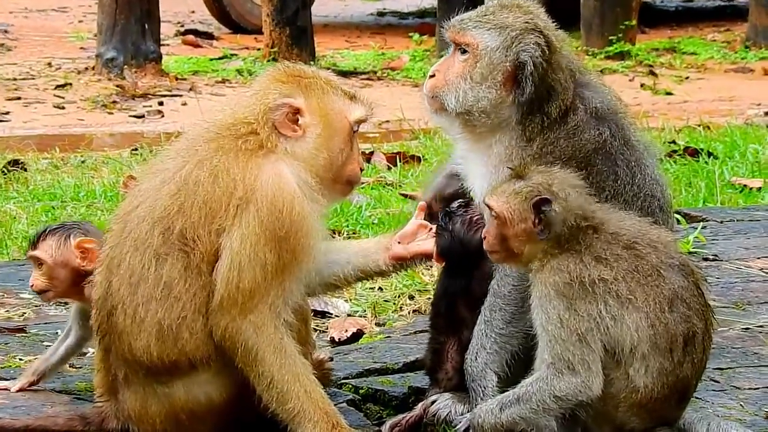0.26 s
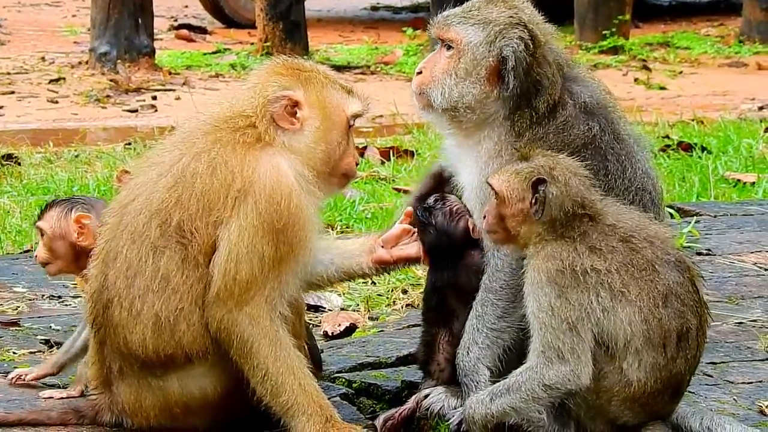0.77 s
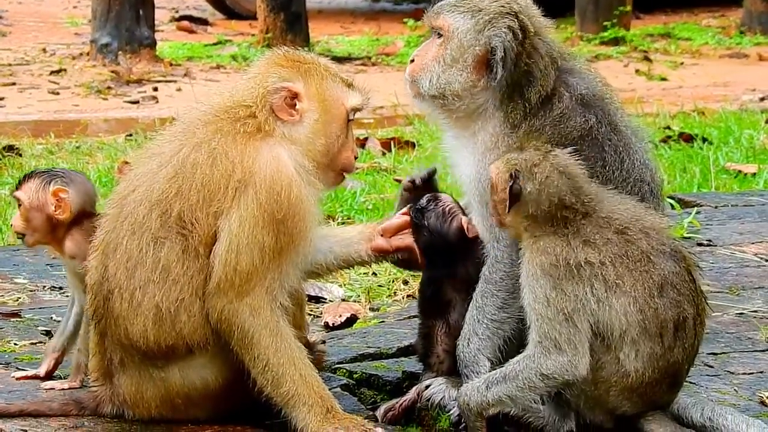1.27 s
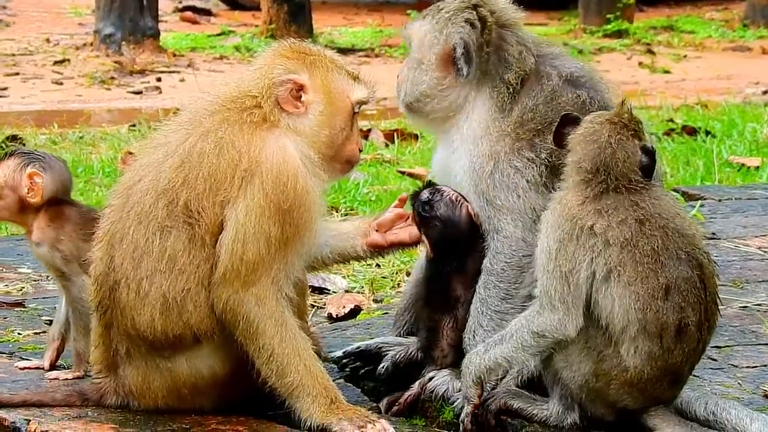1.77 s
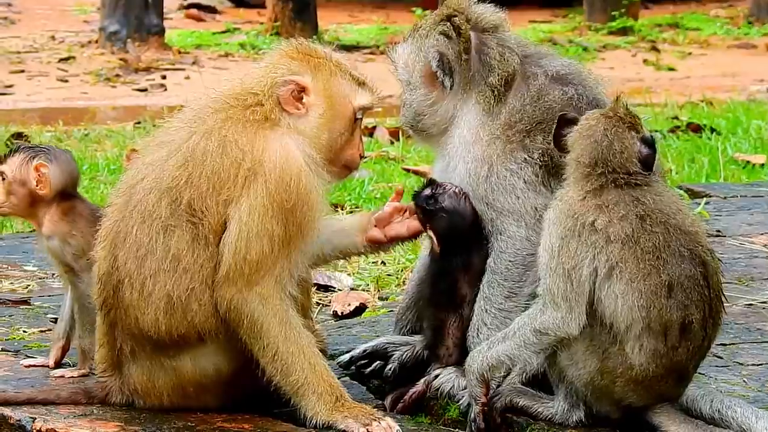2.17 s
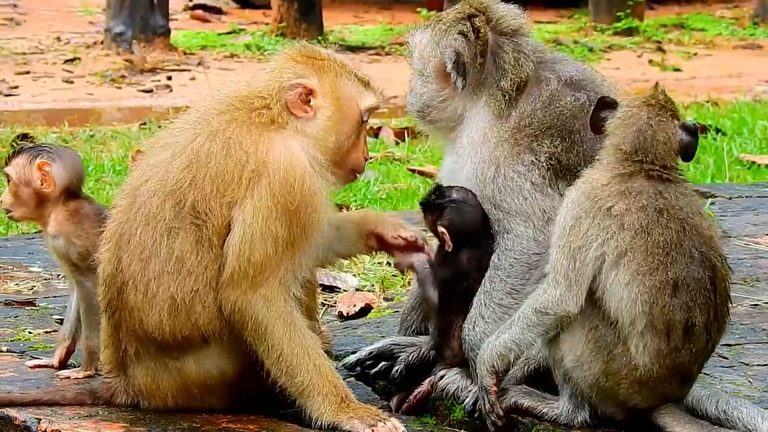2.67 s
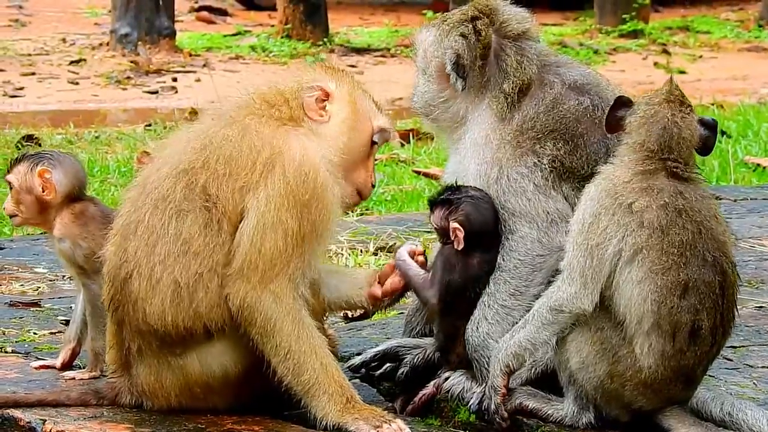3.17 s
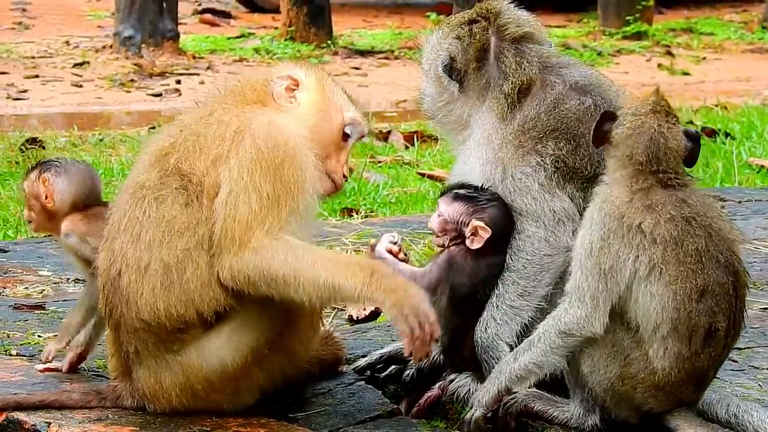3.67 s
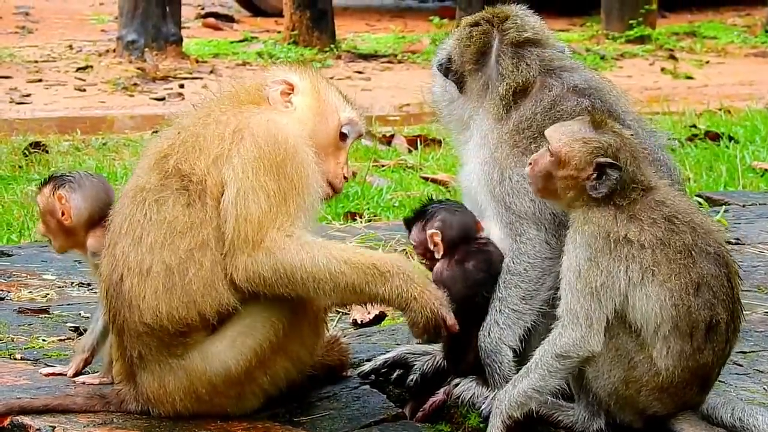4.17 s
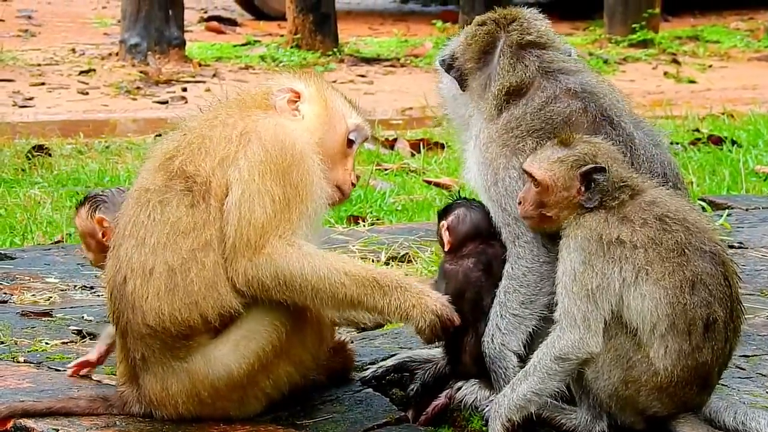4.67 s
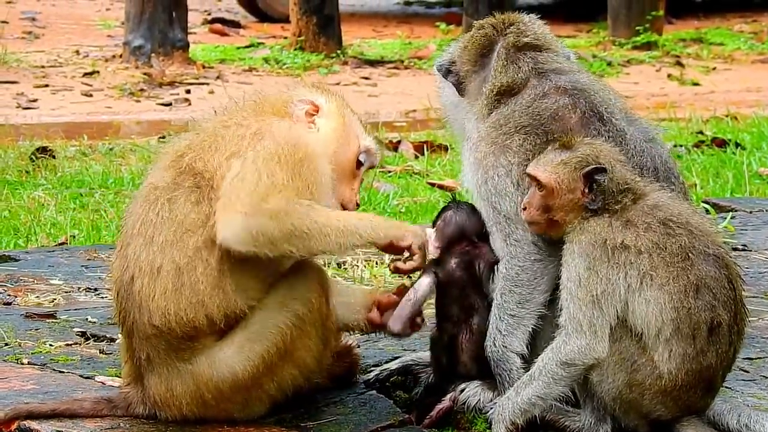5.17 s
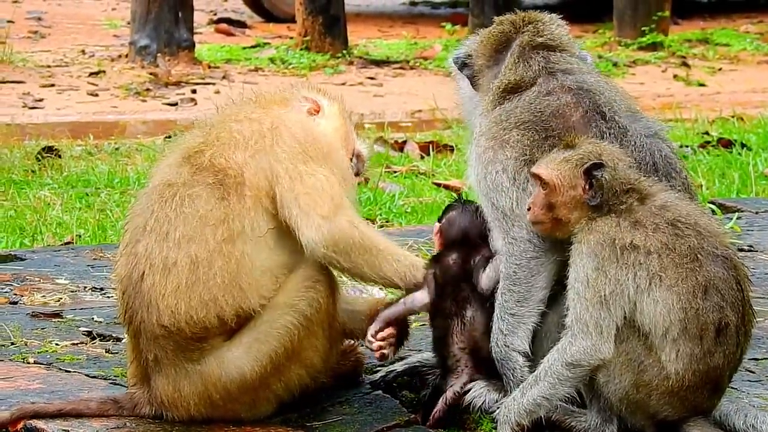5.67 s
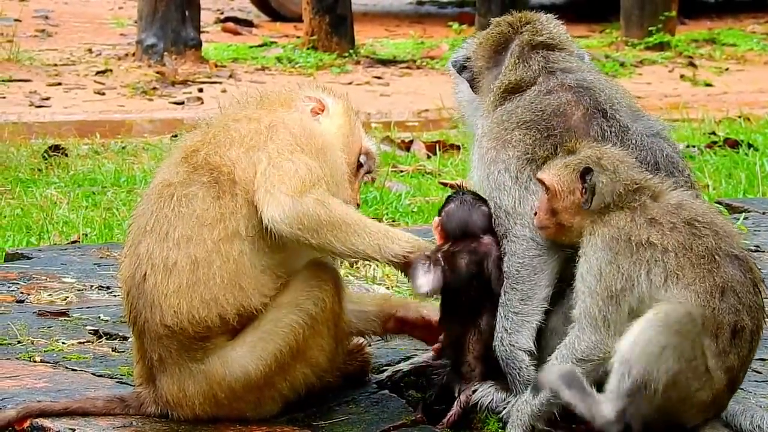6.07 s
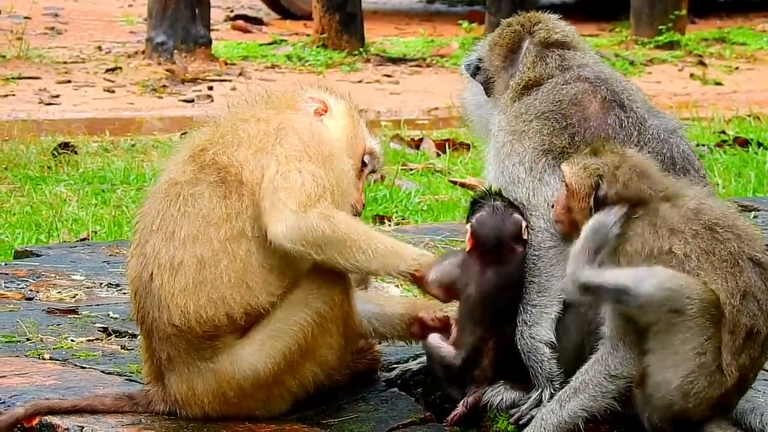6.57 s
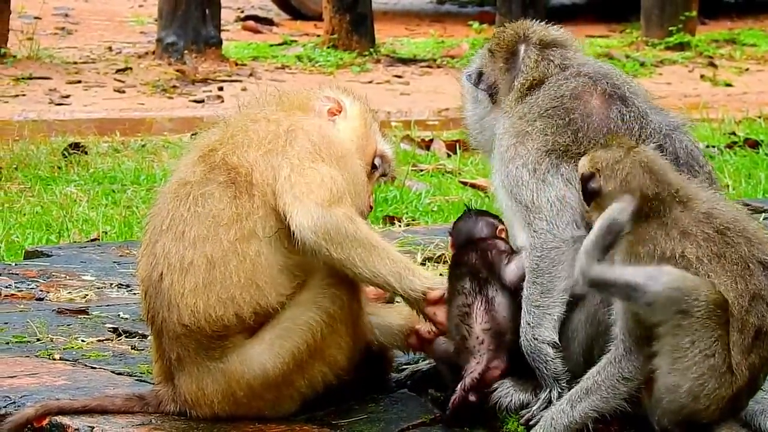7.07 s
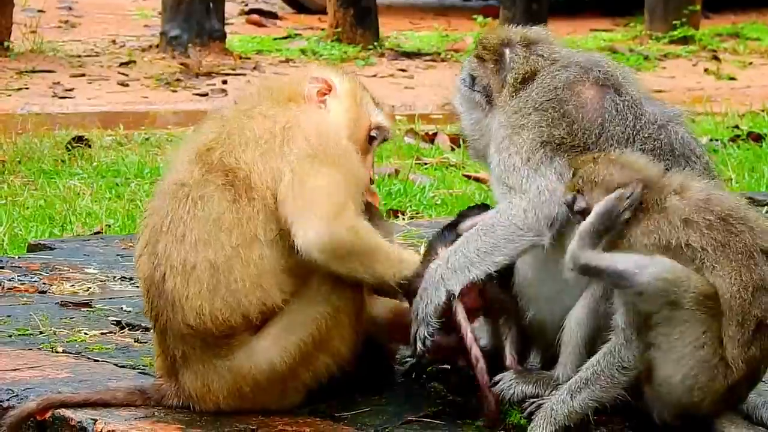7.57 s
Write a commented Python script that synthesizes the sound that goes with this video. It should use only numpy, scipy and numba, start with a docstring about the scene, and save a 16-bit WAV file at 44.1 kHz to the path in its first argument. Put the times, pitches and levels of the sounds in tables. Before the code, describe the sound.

A small monkey troop squabbles outdoors. A hoarse screech is already under way, and raspy bursts follow several times a second, mixed with bright squeals, short chirps and a few whistled coos. Two sharp twig snaps and dull foot thuds come close by. After about five seconds the calls thin out and weaken, leaving rustling, scuffs and a faint late grunt over low rumble and thin hiss.

```python
"""A hoarse screech is already under way, then a quarrelling troop of monkeys: screeches, squeals, chirps, coos
and a late low grunt. Rough folds and breath drive moving mouth resonances; clear calls and chirps are sums
of gliding harmonics. Twigs snap and feet thud as fading modes, and scuffs are gliding bands of noise. Trunks
and leaves smear the calls over filtered noise: a far rumble, rustling and faint hiss."""
import sys
import numpy as np
from scipy import signal
from scipy.fft import rfft, irfft, next_fast_len
from scipy.io import wavfile
from scipy.ndimage import uniform_filter1d
from numba import njit

SR = 44100
rng = np.random.default_rng(int(sys.argv[2]) if len(sys.argv) > 2 else 0)


def to_wav(sig):
    """Store sig (one row per channel, or 1-D mono) as 16-bit WAV at the path in sys.argv[1].

    Samples outside -1..1 are clipped; the rate is SR.
    """
    pcm = np.clip(np.atleast_2d(sig), -1, 1) * 32767
    pcm = np.round(pcm).astype(np.int16)
    wavfile.write(sys.argv[1], SR, pcm.T)  # frames by channels


N = 344421
T = np.arange(N) / SR
STEPS = T[::100]  # coarse clock for slow envelopes
SIDES = np.array([[1], [-1]])  # left, right

# Far hiss spectrum, before it is scaled to HISS_DB: [f/Hz, level/dB]
HISS_SPECTRUM = [(18, -57), (30, -8.5), (98, 0.5), (181, 5), (343, -49), (550, -5.5), (842, -6),
                 (1670, -15), (3480, -38), (6130, -15.5), (8540, -18.5), (11100, -25.5), (18800, -120)]
# Faint treble hiss spectrum, before it is scaled to AIR_DB: [f/Hz, level/dB]
AIR_SPECTRUM = [(6000, -72), (9000, -13), (11000, 5), (14000, -1), (15700, -3.5)]
# Uneven swells of the ground noise:
# [peak t/s, width t/s between 1/e power points, rumble level/dB, rustle level/dB]
GROUND_SWELLS = [(0.394, 0.33, -89, -61.5), (0.98, 0.13, -68.5, -64), (1.365, 0.4, -78, -61),
                 (1.595, 0.25, -98, -67), (2.449, 0.067, -64.5, -65), (2.663, 0.13, -62.5, -72),
                 (3.221, 0.15, -70, -68), (3.723, 0.22, -69.5, -100), (3.948, 0.12, -84, -64.5),
                 (4.712, 0.12, -70, -67), (5.359, 0.34, -73.5, -92), (5.701, 0.043, -71, -102),
                 (6.044, 0.45, -63, -68.5), (6.548, 0.31, -71.5, -69.5), (7.135, 0.28, -68, -72),
                 (7.334, 0.11, -86, -65), (7.518, 0.13, -60.5, -66), (7.747, 0.49, -65, -81)]
# Beds between the calls, fainter screeching and rustling leaves: [t/s, screech level/dB, rustle level/dB]
BEDS = [(0, -57, -82), (.5, -53.5, -75), (.75, -56.5, -95), (1.3, -51, -78), (1.9, -74, -65.5),
        (2.1, -67.5, -76.5), (2.4, -61, -73), (3, -64.5, -84), (3.5, -75, -84.5), (4.1, -60, -68.5),
        (4.6, -69, -74.5), (5.1, -65.5, -77.5), (5.45, -71.5, -71.5), (5.8, -76.5, -79), (6.8, -82.5, -73),
        (7.81, -96, -69)]
# Tint of the screech bed: one level/dB each for lower mouth, upper mouth, throat and top resonance
BED_TINT_DB = [2.5, 0, -10, -2.5]
# Small throats give little bass and foliage takes the treble: [f/Hz, level/dB]
FOLIAGE = [(500, -11.5), (1100, -6.5), (1500, 1.5), (7200, -4.5), (8300, -8.5), (9500, -19.5), (13000, -24)]
# Each snap and its quick reflection from the other side: [t/s, level/dB, left minus right level/dB,
# reflection later by t/s, its level/dB, its left minus right level/dB, hiss level/dB against the snap]
SNAPS = [(1.0411, -16, -10, .0007, -15, 16, -31), (2.3215, -12.5, 16, .0030, -9, -10, -41)]
# Modes of a snapping twig: [f/Hz, level/dB, fade by 60 dB t/s]
TWIG_MODES = [(4763, -12.5, 0.0075), (5880, -14, 0.013), (6730, -2.5, 0.0072), (7700, -16, 0.012),
              (8900, -27, 0.0075), (10940, -33, 0.0073), (14500, -68, .008)]
# Foot thuds: [t/s, level/dB, main mode f/Hz, fade by 60 dB t/s]
THUDS = [(2.309, -34.5, 1652, 0.035), (3.17, -42.5, 899.5, 0.029), (5.814, -54.5, 640.9, 0.069),
         (7.485, -40, 630, 0.039), (7.539, -54, 842, 0.087)]
# Fur and feet scuffing on the paving: [start t/s, level/dB, centre f/Hz at the start, glide f/Hz per s]
SCUFFS = [(6.06, -73, 1865, -2000), (6.2, -69.5, 1287, -1000), (6.299, -63.5, 1117, 1998),
          (6.531, -82, 1142, 8.5), (6.641, -71, 1550, -1000), (6.77, -75, 1231, -1000),
          (6.9, -76.5, 1081, -1000), (7.15, -77, 1496, 1998), (7.27, -64, 2200, -5000),
          (7.345, -66, 1588, -7000), (7.399, -73, 1060, -4000), (7.471, -61.5, 809, 1997),
          (7.55, -70, 1099, 0), (7.66, -72.5, 1390, -1000)]
# Chirps: [start t/s, half duration t/s, glide (share of pitch per half duration), pitch f/Hz,
# then the level/dB of harmonics 1 to 5]
CHIRPS = [(0.3505, 0.022, 0.054, 1431, -52, -36, -41, -58, -62),
          (0.389, 0.032, -0.076, 1470, -69, -37.5, -42, -61, -40),
          (0.49, 0.028, 0.003, 1450, -92, -49, -39.5, -51, -46),
          (0.7395, 0.02, -0.011, 1642, -70, -39.5, -32, -37, -64),
          (1.31, 0.019, 0.009, 1583, -66, -37.5, -56, -58, -53),
          (1.35, 0.047, 0.033, 1348, -74, -70, -48, -46, -61),
          (1.406, 0.033, -0.005, 1350, -71, -46.5, -57, -35, -60),
          (1.525, 0.032, 0.058, 1634, -71, -52, -33, -64, -70),
          (1.652, 0.043, -0.0056, 1921, -50.5, -41, -53, -69, -71),
          (1.9492, 0.024, -0.043, 1330, -55, -52, -37.5, -42, -63),
          (2.404, 0.015, -0.016, 1628, -60, -59, -38, -54, -66),
          (2.4394, 0.076, 0.0008, 1532, -68, -45, -64, -60, -53),
          (2.536, 0.043, 0.06, 1853, -62, -44.5, -39.5, -41.5, -57),
          (2.7137, 0.068, 0.0037, 1745, -68, -46, -50, -53, -72),
          (2.7694, 0.033, -0.059, 1706, -52, -41.5, -47, -56, -77),
          (3.056, 0.035, 0.034, 1594, -83, -47, -44, -49, -55),
          (3.085, 0.039, -0.072, 1427, -80, -45, -44, -70, -60),
          (3.228, 0.03, -0.0036, 1630, -79, -48.5, -40, -48, -67),
          (3.288, 0.058, 0.09, 1503, -91, -45.5, -73, -70, -71),
          (3.563, 0.054, -0.004, 1693, -63, -38, -55, -56, -51),
          (3.63, 0.055, -0.078, 1600, -59, -46, -46, -52, -59),
          (4.0615, 0.034, 0.0036, 1644, -56, -44.5, -37.5, -52, -66),
          (4.09, 0.029, 0.0, 1292, -58, -52, -40, -56, -46),
          (4.2705, 0.024, 0.0059, 1234, -78, -62, -47, -49, -66),
          (4.435, 0.0446, -0.0116, 1661, -81, -44, -39.5, -50, -57),
          (4.602, 0.0353, -0.12, 1394, -72, -45.5, -56, -57, -58),
          (4.675, 0.051, -0.035, 1264, -61, -52, -54, -65, -63),
          (4.8594, 0.021, 0.043, 1302, -72, -36.5, -59, -55, -65),
          (4.885, 0.029, -0.024, 1772, -77, -38.5, -40, -65, -44),
          (5.1249, 0.04, -0.026, 1568, -77, -44, -51, -72, -65),
          (5.28, 0.048, 0.075, 1503, -63.5, -55.5, -65, -52, -71),
          (5.35, 0.085, 0.031, 1714, -89, -58, -89, -72, -71),
          (5.6125, 0.05, -0.006, 1853, -59, -48, -68, -71, -59),
          (6.3904, 0.037, -0.052, 1770, -74, -55, -50.5, -84, -61),
          (7.162, 0.047, 0.015, 1783, -74, -49.5, -41.5, -75, -62),
          (7.497, 0.036, 0.015, 1500, -55.5, -57.5, -60, -65, -66)]
# Coos, with the first squeal's fundamental as first row and a low grunt as last, a list of points per call:
# [t/s, pitch f/Hz, fundamental level/dB, 2nd harmonic level/dB]
COOS = [
    [(0.16, 718, -78, -78), (0.2, 790, -66, -80), (0.235, 790, -67, -72), (0.28, 800, -72, -84)],
    [(1.41, 942, -82, -81), (1.426, 935, -59, -58), (1.444, 1019, -50, -84), (1.528, 1015, -47, -100),
     (1.612, 1075, -38.5, -64), (1.68, 1072, -50, -69), (1.904, 1043, -53, -61), (1.964, 969, -69, -70),
     (1.99, 1025, -85, -70)],
    [(2.33, 601.5, -105, -88), (2.36, 593, -64, -95), (2.406, 633, -57, -99), (2.426, 650, -60, -85),
     (2.466, 646.5, -56.5, -103), (2.662, 586, -66, -98), (2.7, 580, -102, -88)],
    [(3.8, 791, -80, -102), (3.824, 805, -52.5, -77), (3.9, 911.2, -50.5, -82), (4.13, 915, -51, -48.5),
     (4.2, 919.4, -49, -57), (4.258, 907, -53.5, -39), (4.358, 898, -59.5, -101), (4.406, 874, -62, -48),
     (4.42, 819, -100, -71)],
    [(7.42, 611, -72, -76), (7.46, 628, -63, -72), (7.59, 647, -71, -76)],
]
# Squeals, a list of points per call: [t/s, pitch f/Hz, level/dB of 2nd, 3rd and 4th harmonic]
SQUEALS = [
    [(.17, 770, -62, -81, -67), (.205, 784, -55, -75, -52), (.24, 870, -74, -72, -60),
     (.275, 880, -84, -64, -53), (.3, 887, -71, -60, -59), (.39, 880, -68, -61, -66)],
    [(.545, 831, -62, -48, -65), (.59, 929, -60, -54, -47.5), (.65, 913, -66, -60, -48),
     (.7, 905, -63, -57, -53), (.74, 860, -62, -60, -60)],
    [(.9, 740, -80, -64, -61), (.915, 752, -78, -60.5, -48), (.978, 872, -65, -52, -46),
     (1.08, 860.6, -68, -55, -45), (1.15, 803, -68, -73, -56)],
    [(2.13, 875, -80, -62, -72), (2.18, 890, -72, -66, -76), (2.21, 925, -58, -58, -62),
     (2.25, 925, -50, -62, -56), (2.3, 915, -58, -60, -58)],
    [(5.87, 789, -61, -67, -106), (5.915, 923, -66, -65, -68), (5.96, 929, -67, -55, -55),
     (6.005, 896, -56, -54.5, -58), (6.05, 880, -76, -56, -60), (6.09, 896, -73, -68, -62.5),
     (6.22, 908, -96, -92, -78)],
]
# Pitch unsteadiness, one share of the pitch per squeal
SQUEAL_WAVER = [.012, .007, .004, .012, .014]
# Upper harmonics, one row per squeal: [level/dB of harmonics 5 to 9 against the 4th]
SQUEAL_TOP_DB = [
    [3, 6, -6, 1, -12],
    [-29, -10, -9.5, -23, -21],
    [-36, -28, -19, -24, -29],
    [-10, -10, -10, -15, -20],
    [-20, -6, -6, -11, -17],
]
# How much each harmonic flares and drops out: one level/dB spread factor per squeal
SQUEAL_BREAKUP_DB = [6, 4, 2, 5, 5]
# Hoarse screeches: [start t/s, rise t/s, hold t/s, level/dB, lower mouth f/Hz, upper mouth f/Hz, top f/Hz,
# upper, throat and top level/dB against the lower, vocal fold rate f/Hz, left minus right level/dB]
SCREECHES = [(-0.048, 0.039, 0.049, -47, 3440, 4640, 6630, 8, -4.5, 8, 913, -1.5),
             (0.15, 0.12, 0.084, -48, 3800, 5440, 6970, 5.5, -1, 6, 881, 1.5),
             (0.311, 0.091, 0.077, -49.0, 2900, 5200, 6660, 4, -28, 8.5, 763, 2),
             (0.424, 0.058, 0.031, -45.5, 3300, 4870, 5850, 3, -2.5, -3, 901, -2),
             (0.51, 0.067, 0.048, -52.5, 3540, 5620, 5730, -12, -16, 8.5, 912, -2.5),
             (0.648, 0.071, 0.04, -43.0, 3270, 5000, 6370, -2.5, -29, -2, 871, -1.5),
             (0.749, 0.054, 0.092, -52.0, 2770, 5170, 6140, 5.5, -26, 2.5, 910, -0.5),
             (0.868, 0.1, 0.048, -55, 3340, 5820, 6730, -8, -20, -23, 877, 7),
             (0.997, 0.079, 0.056, -38, 3220, 5350, 6600, 5, -38, 2.5, 864, 1.5),
             (1.23, 0.082, 0.058, -48.0, 3460, 5040, 6200, -2.5, -8, -4, 789, -0.5),
             (1.339, 0.089, 0.028, -50.5, 3650, 5350, 5940, 4, -14, 5, 789, 0),
             (1.476, 0.072, 0.086, -51.5, 3240, 5000, 7030, 7, -6.5, 0.5, 840, 0.5),
             (1.6, 0.065, 0.096, -55.0, 3740, 5430, 5900, 10.5, -5.5, 7.5, 954, -1),
             (1.792, 0.077, 0.1, -59.5, 4200, 6060, 6270, -17, 4, -21, 952, 1.5),
             (1.888, 0.07, 0.021, -44.5, 3670, 5110, 6860, 4, -29, 0, 928, -2.5),
             (2.151, 0.11, 0.015, -50.5, 4180, 4450, 6800, 8, -2.5, 7.5, 918, -0.5),
             (2.315, 0.019, 0.08, -49.5, 3090, 4640, 6600, 4.5, -14, 9, 812, 1),
             (2.495, 0.047, 0.012, -46.5, 3180, 6200, 6170, 9, -9.5, 5, 958, 0.5),
             (2.647, 0.11, 0.15, -47.5, 2780, 5430, 6600, -1, -25, -2.5, 890, 0.5),
             (2.874, 0.019, 0.047, -58.0, 2560, 4960, 6500, -7, -19, -13, 951, 2),
             (3.02, 0.087, 0.038, -46.5, 3260, 5050, 7100, -0.5, -30, 1, 919, -0.5),
             (3.172, 0.04, 0.016, -52.0, 3380, 5000, 6400, -20, -4.5, -5, 798, 0.5),
             (3.259, 0.079, 0.043, -54, 2800, 4970, 7100, 0.5, -39, 1.5, 812, 2.5),
             (3.52, 0.05, 0.13, -50.0, 2970, 5050, 6830, -4, -17, -1.5, 780.5, 2.5),
             (3.699, 0.098, 0.17, -60, 3940, 4090, 6150, 7.5, -2, 0.5, 822, 0),
             (3.823, 0.089, 0.11, -53.0, 3320, 5240, 6520, 1, -6.5, 3.5, 888, 1.5),
             (4.016, 0.061, 0.013, -45, 3200, 5440, 6060, -6.5, -30, -7.5, 953, 1.5),
             (4.161, 0.1, 0.062, -52.5, 3670, 5460, 6700, 2.5, 0.5, 5.5, 975, 0),
             (4.361, 0.077, 0.013, -54, 3160, 5070, 6830, 1.5, -4, 4, 826.5, 0),
             (4.577, 0.0638, 0.0561, -53.0, 3700, 4760, 6900, 7, -8, 0.5, 933, 0),
             (4.701, 0.043, 0.13, -61.5, 2570, 5250, 6900, -19, -9, -29, 921, 1.4),
             (4.834, 0.042, 0.014, -43, 3034, 5168, 7000, 5, -35, -2, 949.4, 0),
             (5.103, 0.027, 0.06, -50, 2900, 5400, 6400, -2, -30, -3.5, 784.5, 1),
             (5.17, 0.055, 0.062, -57, 3000, 5050, 6200, 3.5, -24, 0, 777, 1),
             (5.451, 0.086, 0.1, -61.0, 3160, 6300, 5930, -17, 1.5, -0.5, 868, 2.5),
             (5.591, 0.022, 0.032, -54.5, 3630, 5250, 6420, -1.5, -10, 3, 930, -2),
             (5.841, 0.11, 0.14, -59.5, 3280, 5670, 5950, -24, 4.5, 5, 893, -2.5),
             (6.29, 0.12, 0.016, -56.5, 3250, 5540, 7640, -1, -17, 2, 886, 0),
             (6.61, 0.1, 0.026, -72, 2760, 5100, 6650, -0.5, 0.5, 3.5, 962, 2),
             (6.78, 0.049, 0.016, -77, 2750, 4620, 7270, -3, -5, 7.5, 917, -1),
             (7.104, 0.067, 0.045, -65.5, 3610, 5400, 6940, 6.5, 4.5, 13.5, 886, 1.5),
             (7.249, 0.023, 0.11, -76, 2480, 5460, 6870, 7.5, 2, 14.5, 887, 1),
             (7.426, 0.082, 0.13, -64.5, 4140, 5330, 6160, -0.5, 1, 0, 762, 5.5),
             (7.67, 0.037, 0.064, -71, 2430, 4680, 6660, 2.5, -13, 5.5, 922, -1)]

HISS_DB, AIR_DB, RUMBLE_DB = -62.5, -85.5, -76.5  # the rumble is the bed between the swells
TREES_T60_S, TREES_DB, SIDE_DB, SIDE_HZ = 0.32, -4, 0, 5370
PORT_LAG = .3  # half the lag between the two microphone ports, in samples
TOP_HZ = 15700
CRACK_S = .001  # decay of the hiss as the fibres part
SCUFF_RISE_S, SCUFF_HOLD_S, SCUFF_FALL_DB_PER_S = 0.05, 0.03, 170
COO_WAVER, COO_BREAKUP_DB = 0.0055, 1.2  # pitch share, harmonic flare
SCREECH_FALL_DB_PER_S, HOLD_SAG_DB_PER_S = 192, 20
MOUTH_WANDER = 0.047  # share of each mouth resonance
MOUTH_PEAK_HZ, MOUTH_PEAK_SHARE = 400., .35  # width and weight of each resonance's sharp tip


def undb(db):
    """Amplitude factor of a level in dB."""
    return 10 ** (np.asarray(db) / 20)


def unit(x):
    """Scale to an rms of 1."""
    return x / np.sqrt(np.mean(x ** 2))


def columns(table, t=T):
    """Table columns joined by straight lines in time."""
    s, *cols = np.transpose(table)
    return [np.interp(t, s, c) for c in cols]


def colour(x, points):
    """Filter through (Hz, dB) points joined along log frequency."""
    hz, db = np.transpose(points)
    size = next_fast_len(N)
    f = np.maximum(np.fft.rfftfreq(size, 1 / SR), 1)
    gain = undb(np.interp(np.log(f), np.log(hz), db))
    return irfft(rfft(x, size) * gain, size)[..., :N]


def walk(rate):
    """Random levels held for 1 / rate s and smoothed twice; rms 1."""
    k = int(SR / rate)
    held = rng.standard_normal(4096)[np.arange(N) // k % 4096]
    return unit(uniform_filter1d(uniform_filter1d(held, k), k))


@njit
def band(x, hz, width):
    """State-variable band-pass with a moving centre, gain 1 there."""
    y, b, l = np.empty(len(x)), 0., 0.
    for i in range(len(x)):
        g, k = np.tan(np.pi * hz[i] / SR), width / hz[i]
        v = (b + g * (x[i] - l)) / (1 + g * (g + k))
        b, l, y[i] = 2 * v - b, l + 2 * g * v, k * v
    return y


def ring(hz, t60, t):
    """One mode fading by 60 dB in t60 s."""
    return np.sin(2 * np.pi * hz * t) * np.exp(-np.log(1000) * t / t60)


def add(out, s, sound):
    """Mix a sound in from s seconds on."""
    i = int(s * SR)
    out[..., i:i + sound.shape[-1]] += sound[..., :N - i]


def bursts(start, rise, hold, fall_db_per_s, sag_db_per_s=0):
    """Power envelope of each event (rows): curved rise, sagging hold, steady fall in dB."""
    age = STEPS - np.c_[start]
    sag_db = sag_db_per_s * np.clip(age - np.c_[rise], 0, np.c_[hold])
    fall_db = fall_db_per_s * np.maximum(age - np.c_[rise + hold], 0)
    return np.clip(age / np.c_[rise], 0, 1) ** 4 * undb(-2 * (sag_db + fall_db))


def total(power, db):
    """Amplitude of overlapping events: their powers add."""
    return np.interp(T, STEPS, np.sqrt(undb(2 * db) @ power))


def leading(power, db, values):
    """A property of overlapping events, the louder counting more."""
    weight = power * np.c_[undb(2 * db)] + 1e-30
    return np.interp(T, STEPS, values @ weight / weight.sum(axis=0))


def ground_swells():
    """Rumble and rustle amplitudes: a bed for each plus bell-shaped swells, added as powers."""
    peak, width, rumble_db, rustle_db = np.transpose(GROUND_SWELLS)
    power = np.exp(-(2 * (STEPS - np.c_[peak]) / np.c_[width]) ** 2)
    rumble = np.hypot(undb(RUMBLE_DB), total(power, rumble_db))
    rustle = np.hypot(undb(columns(BEDS)[1]), total(power, rustle_db))
    return rumble, rustle


def background():
    """Filtered noise: far rumble, flickering rustle of fur and leaves, and a thin steady hiss."""
    rumble_gain, rustle_gain = ground_swells()
    noise = rng.standard_normal((6, N))
    rumble = colour(noise[:2], [(25, -49), (60, -4.0), (130, -1.5), (200, -10.0), (400, -15.5),
                                (800, -40.5), (3000, -85)])
    flicker_db = 2
    low = colour(noise[2:4] * undb(flicker_db * walk(11.0)),
                 [(150, -24.0), (350, -23.5), (700, -1.0), (1000, 2.0), (2000, -26.5), (8000, -82.0)])
    high = colour(noise[2:4] * undb(flicker_db * walk(5.9)),
                  [(600, -30.0), (1200, -1.0), (2000, 8.0), (3200, -7.5), (6000, -40.0), (12000, -87.0)])
    rustle = low + undb(-9.5) * high
    hiss = colour(noise[4:], HISS_SPECTRUM)
    hiss_side = colour(hiss[1], [(200, -38.5), (1500, 0.5), (8000, 5.5)])
    # each layer is a shared middle plus a side signal of opposite sign left and right
    rumble = rumble_gain * (rumble[0] + 0.17 * SIDES * rumble[1]) / rumble.std()
    rustle = rustle_gain * (rustle[0] + 0.35 * SIDES * rustle[1]) / rustle.std()
    return rumble + rustle + undb(HISS_DB - 9.5) * (hiss[0] + SIDES * hiss_side) / hiss.std()


def treble_hiss():
    """Faint treble noise, independent left and right, whose level flickers slowly."""
    flicker_db = 2
    hiss = unit(colour(rng.standard_normal((2, N)), AIR_SPECTRUM))
    return undb(AIR_DB + flicker_db * walk(3.56)) * hiss


def scuffs():
    """Short rubs of noise through one gliding resonance, in uneven grains."""
    start, level_db, hz, glide = np.transpose(SCUFFS)
    rise = np.full(len(start), SCUFF_RISE_S)
    power = bursts(start, rise, SCUFF_HOLD_S, SCUFF_FALL_DB_PER_S)
    centre_hz = leading(power, level_db, hz - glide * start) + T * leading(power, level_db, glide)
    grain_db, width_hz = 3, 480.
    grains = rng.standard_normal(N) * undb(grain_db * walk(45))
    rub = band(grains, np.clip(centre_hz, 300, 4000), width_hz)
    rub = colour(rub, [(250, 13.0), (500, 5.5), (2500, -2.5), (5000, -67)])
    return unit(rub) * total(power, level_db)


def thuds():
    """Feet thud on the paving: three neighbouring modes with a 2 ms onset."""
    out, t = np.zeros((2, N)), T[:SR // 5]
    for s, db, hz, t60 in THUDS:
        body = ring(hz, t60, t)
        body = body + 0.66 * ring(1.045 * hz, 0.57 * t60, t) + 0.66 * ring(0.9 * hz, t60, t)
        add(out, s, undb(db) * body * np.minimum(t / 0.002, 1))
    return out


def twig_snaps():
    """Snaps and their reflections ring the same few twig modes, slightly rebalanced, under a tick of hiss."""
    out, t = np.zeros((2, N)), T[:SR // 5]
    arrivals = []
    for s, db, pan_db, lag, db2, pan2_db, hiss_db in SNAPS:
        arrivals += [(s, db, pan_db, hiss_db), (s + lag, db2, pan2_db, hiss_db)]
    chances = rng.standard_normal((len(arrivals), len(TWIG_MODES)))
    for (s, db, pan_db, hiss_db), chance in zip(arrivals, chances):
        snap = sum(undb(g + 1.5 * c) * ring(hz, t60, t) for (hz, g, t60), c in zip(TWIG_MODES, chance))
        hiss = np.diff(rng.standard_normal(len(t) + 1)) * np.exp(-t / CRACK_S)
        snap = (snap + undb(hiss_db) * hiss) * (1 - np.exp(-t / .0003)) ** 2  # softened onset
        add(out, s, snap * undb(db + SIDES * pan_db / 2))
    return out


def trees(x):
    """Direct sound plus scattering from trunks; the two ports differ mostly in the treble."""
    t = T[:SR // 2]
    tails = rng.standard_normal((2, len(t))) * np.exp(-np.log(1000) * t / TREES_T60_S)
    tails /= np.sqrt(np.sum(tails ** 2, axis=1, keepdims=True))
    mid, side = (signal.fftconvolve(x, tail)[:N] for tail in tails)
    side = signal.lfilter(*signal.butter(1, SIDE_HZ, "high", fs=SR), side)
    return x + undb(TREES_DB) * mid + undb(SIDE_DB) * side * SIDES


def chirps():
    """Brief gliding, slightly hoarse squeaks that swell fast and break off; each harmonic flutters alone."""
    out, wobble, flutter_db = np.zeros(N), .018 * walk(400), 2.5
    flutter = [undb(flutter_db * (.7 * walk(70) + .7 * walk(350))) for _ in range(5)]
    for s, length, glide, hz, *dbs in CHIRPS:
        t = np.arange(int(2 * length * SR)) / SR / length  # runs from 0 to 2
        a = int(s * SR)
        b = a + len(t)
        shape = np.minimum(t / .23, 1) * np.exp(-.6 * t ** 3)
        phase = 2 * np.pi * np.cumsum(hz * (1 + glide * (t - .5) + wobble[a:b])) / SR
        voice = sum(undb(db) * flutter[k][a:b] * np.sin((k + 1) * phase) for k, db in enumerate(dbs))
        add(out, s, shape * voice)
    return out


def clear_calls(calls, orders, wavers, tops_db, breakups_db):
    """Harmonics on one wavering pitch, each with its level and its own dropouts; short fades."""
    out, drift = np.zeros(N), walk(150)
    flare = [.7 * walk(30) + .7 * walk(250) for _ in range(10)]
    for call, waver, top_db, breakup_db in zip(calls, wavers, tops_db, breakups_db):
        a, b = int(call[0][0] * SR), int(call[-1][0] * SR)
        hz, *dbs = columns(call, T[a:b])
        phase = 2 * np.pi * np.cumsum(hz * (1 + waver * drift[a:b])) / SR
        levels = list(zip(orders, dbs))
        levels += [(k, dbs[-1] + db) for k, db in enumerate(top_db, 5)]
        voice = sum(undb(db + breakup_db * flare[k][a:b]) * np.sin(k * phase) for k, db in levels)
        add(out, call[0][0], np.sqrt(2) * voice * signal.windows.tukey(b - a, .15))
    return out


def coos():
    """Coos, a low grunt near the end and the first squeal's fundamental, each with a 2nd harmonic."""
    n = len(COOS)
    return clear_calls(COOS, (1, 2), [COO_WAVER] * n, [[]] * n, [COO_BREAKUP_DB] * n)


def squeals():
    """Bright calls of harmonics 2 to 9; the first one's fundamental is the first row of COOS."""
    return clear_calls(SQUEALS, (2, 3, 4), SQUEAL_WAVER, SQUEAL_TOP_DB, SQUEAL_BREAKUP_DB)


def fold_tone(pitch_hz):
    """Unsteady vocal folds: strong-weak cycles add weaker partials half-way between the harmonics."""
    jitter, slide = .022, .035  # cycle unevenness and slower pitch slides, in shares
    odd_db, patchy_db = -2.0, 6  # half-way partials; how far each partial flares and fades alone
    rate_hz = pitch_hz / 2 * (1 + jitter * walk(250) + slide * walk(22))
    phase = 2 * np.pi * np.cumsum(rate_hz) / SR
    return unit(sum(undb(odd_db * (k % 2) + patchy_db * walk(60)) * np.sin(k * phase + k * k)
                    for k in range(3, 22)))


def screeches():
    """Folds and breath through throat and mouth resonances; also returns the side the calls come from."""
    (start, rise, hold, level_db, low_hz, high_hz, top_hz,
     high_db, throat_db, top_db, pitch_hz, pan_db) = np.transpose(SCREECHES)
    power = bursts(start, rise, hold, SCREECH_FALL_DB_PER_S, HOLD_SAG_DB_PER_S)
    low_hz, high_hz, top_hz, pitch_hz, pan_db = (
        leading(power, level_db, c) for c in (low_hz, high_hz, top_hz, pitch_hz, pan_db))

    shimmer_db, breath_db, rasp_db = 1.0, -.5, 2  # the breath comes in uneven grains
    breath = rng.standard_normal(N)
    source = fold_tone(pitch_hz) * undb(shimmer_db * walk(120))
    source = source + undb(breath_db + rasp_db * walk(200)) * breath

    def tipped(x, hz):
        return x + MOUTH_PEAK_SHARE * band(x, hz, MOUTH_PEAK_HZ)

    low = band(source, low_hz * (1 + MOUTH_WANDER * walk(16)), 1870.0)
    high = band(source, high_hz * (1 + MOUTH_WANDER * walk(14)), 1000.0)
    throat_hz = 1750 * (1 + .06 * walk(2.7))
    throat = band(band(source + breath, throat_hz, 4200.0), throat_hz, 4200.0)
    top_hz = top_hz * (1 + MOUTH_WANDER * walk(14))
    top = band(band(source, top_hz, 5500.0), top_hz, 1970.0)
    parts = (tipped(low, low_hz), -tipped(high, high_hz), throat, tipped(top, top_hz))

    bed_db, voice = columns(BEDS)[0], 0
    for part, db, tint_db in zip(parts, (0, high_db, throat_db, top_db), BED_TINT_DB):
        voice = voice + np.hypot(total(power, level_db + db), undb(bed_db + tint_db)) * unit(part)
    return voice, pan_db


def scene():
    """Set the panned troop among the trees, with knocks and scuffs, over the noise background."""
    backdrop = (background() + treble_hiss()) * undb(.6 * SIDES)
    clear, squeaks = squeals() + coos(), chirps()
    hoarse, pan_db = screeches()
    troop = colour(hoarse + undb(-4.0) * squeaks, FOLIAGE) + undb(-1.5) * clear
    calls = trees(troop) + undb(-10.0) * clear + undb(-18.5) * squeaks
    near = calls * undb(SIDES * pan_db / 2) + twig_snaps() + thuds() + scuffs()
    # near sounds reach the left port a little earlier: the slope stands in for a tiny shift
    near = near + PORT_LAG * np.gradient(near, axis=1) * SIDES
    return near + backdrop


def record(dry):
    """The recorder cuts the top with a steep elliptic low-pass."""
    return signal.sosfilt(signal.ellip(8, .2, 70, TOP_HZ, fs=SR, output="sos"), dry)


dry = scene()
out = record(dry)
to_wav(out)
```